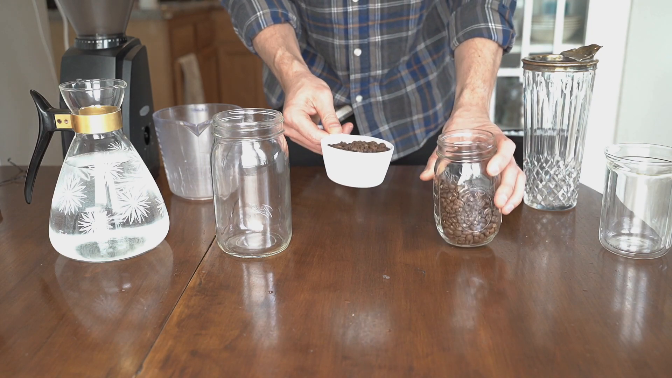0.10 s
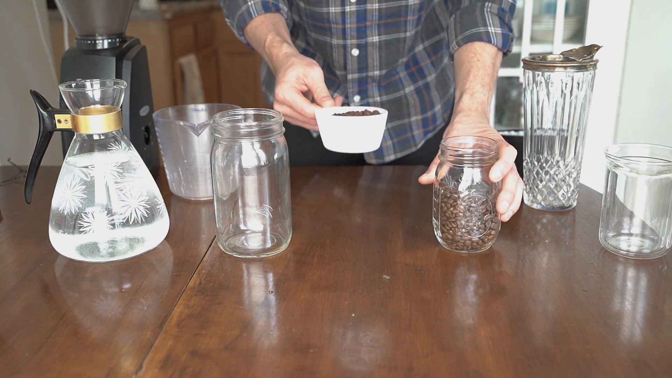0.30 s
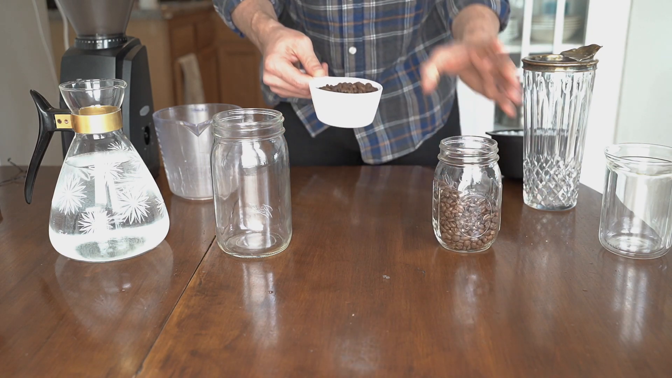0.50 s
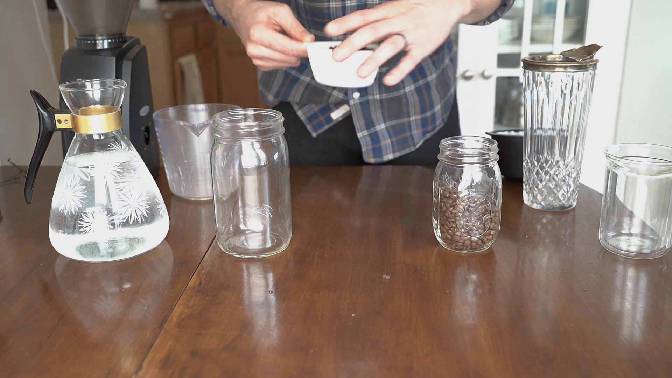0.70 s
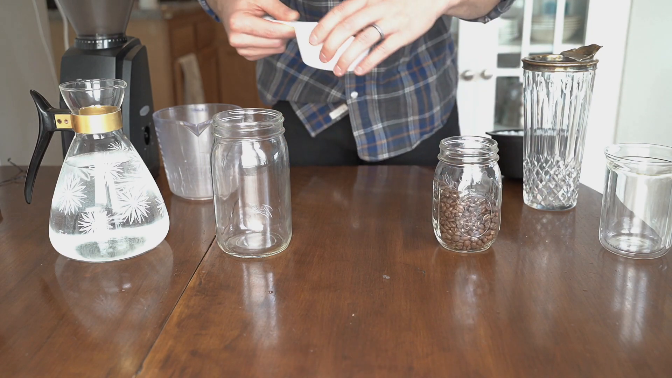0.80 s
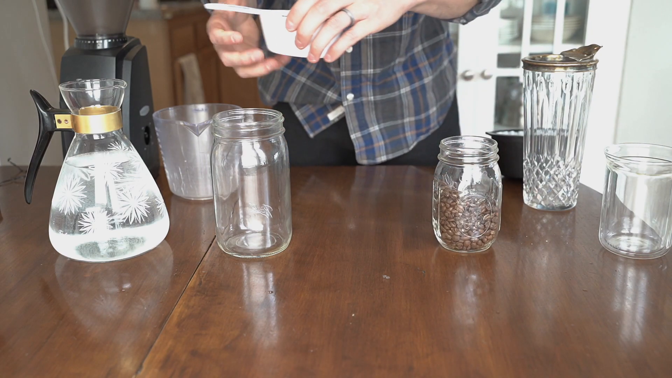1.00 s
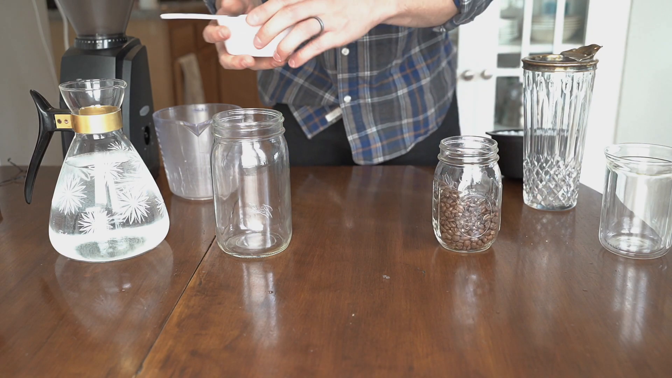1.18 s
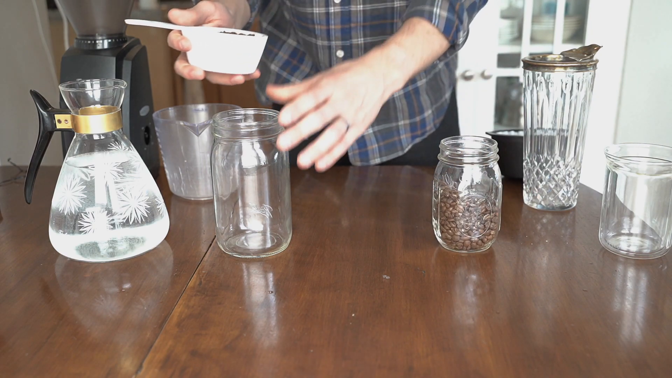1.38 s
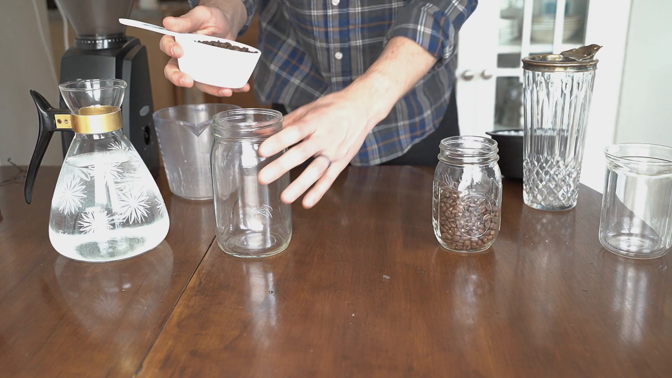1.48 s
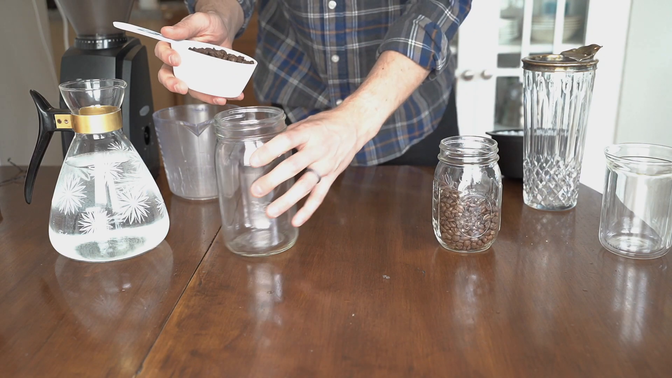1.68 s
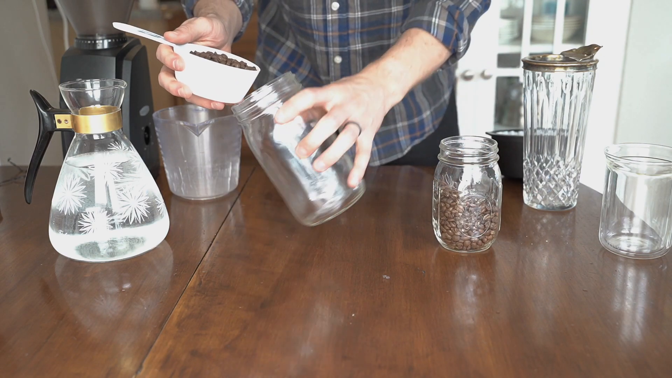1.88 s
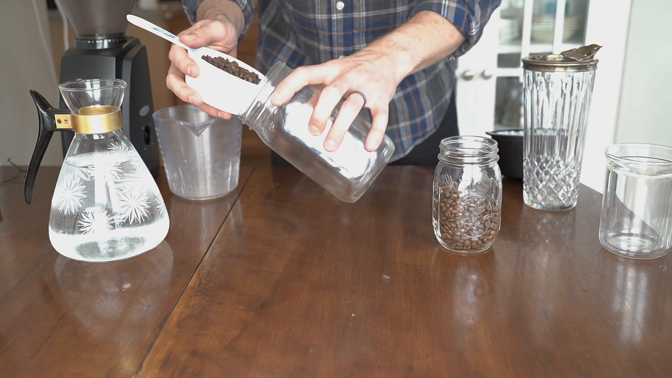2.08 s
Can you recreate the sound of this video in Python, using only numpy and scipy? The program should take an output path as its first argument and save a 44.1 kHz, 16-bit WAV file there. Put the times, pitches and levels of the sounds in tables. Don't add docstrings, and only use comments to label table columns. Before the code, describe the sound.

Coffee beans rattle briefly in a glass jar, which thumps down on a wooden table; after a pause beans crunch in a plastic cup, then its rim clicks on an empty jar. Close microphone, small kitchen.

```python
import sys
import numpy as np
from scipy import signal
from scipy.fft import rfft, irfft, next_fast_len
from scipy.io import wavfile
from scipy.ndimage import map_coordinates

SR = 44100
rng = np.random.default_rng(int(sys.argv[2]) if len(sys.argv) > 2 else 0)


def gain_from_decibels(decibels):
    exponent = np.asarray(decibels, float) / 20
    return 10 ** exponent


def dump(signal):
    limited = np.clip(np.atleast_2d(signal).T, -1, 1)
    pcm = np.round(limited * 32767).astype(np.int16)
    wavfile.write(sys.argv[1], SR, pcm)


N = 94815

WET_DB = {"rattle": -9.5, "thump": 3, "rock": -7, "cup": -11.5, "tap": -10, "glass": -18.5}


def unit(x):
    return x / np.sqrt(np.mean(x ** 2) + 1e-20)


def along(points, hz):
    f, v = np.transpose(points)
    return np.interp(np.log(hz + 1), np.log(f + 1), v)


def filtered(x, response):
    m = 2 * next_fast_len(N // 2 + SR // 4)
    spectrum = rfft(x, m) * response(np.fft.rfftfreq(m, 1 / SR))
    return irfft(spectrum, m)[..., :N]


def causal(spectrum):
    def response(hz):
        cepstrum = irfft(np.log(np.maximum(gain_from_decibels(along(spectrum, hz)), 1e-4)))
        cepstrum[1:len(hz) - 1] *= 2
        cepstrum[len(hz):] = 0
        gain = np.exp(rfft(cepstrum))
        return gain / np.abs(irfft(gain)).max()
    return response


def band(hz, width_hz):
    return unit(filtered(rng.standard_normal(N), lambda f: 1 / (1 + ((f - hz) / width_hz) ** 4)))


def ring(modes, s, db, rise_s):
    t = np.maximum(np.arange(N) / SR - s, 0)
    decaying = sum(gain_from_decibels(db + level - 60 * t / t60) * np.sin(2 * np.pi * hz * t) for hz, level, t60 in modes)
    return (1 - np.exp(-t / rise_s)) * decaying


def clicks(events):
    x = np.zeros(N)
    for s, db, *_ in events:
        x[round(s * SR)] = gain_from_decibels(db)
    return x


def grains(per_s, spread_db):
    chance, sign, size = rng.random((3, N))
    return (chance < per_s / SR) * np.sign(sign - .5) * gain_from_decibels(-spread_db * np.log(size + 0.03))


def bursts(rows, rise_s):
    t = np.arange(N) / SR
    envelope = 0
    for s, db, length in rows:
        rise = np.clip((t - s) / rise_s, 0, 1)
        envelope = envelope + gain_from_decibels(db) * rise * np.exp(-np.maximum(t - s - length, 0) / rise_s)
    return envelope


def room(x, wet_db, direct=1):
    # f/Hz, t60/s
    kitchen = [(100, 0.4), (300, 0.45), (700, 0.33), (2000, 0.32), (5000, 0.33), (8000, 0.3), (14000, 0.23)]
    hz, t, z = signal.stft(rng.standard_normal(SR), SR, nperseg=256)
    decay = gain_from_decibels(-60 * t / along(kitchen, hz)[:, None])
    tail = signal.istft(z * decay, SR, nperseg=256)[1]
    tail = np.pad(tail, (90, 0))
    return direct * x + gain_from_decibels(wet_db) * 2 * signal.fftconvolve(x, tail / np.linalg.norm(tail))[:N]


def full_jar():
    # t/s, level/dB
    rattle = [(0, -41.5), (.05, -44), (.08, -41), (.165, -47), (.19, -70), (0.224, -51), (.24, -76),
              (.29, -78)]
    # t/s, level/dB rms, length/s
    bean_hits = [(.0668, -27, 0.0012), (.0815, -30.5, 0.0022), (.1008, -30.5, 0.0018),
                 (.1275, -36.5, 0.0014), (.1458, -33.5, 0.0018), (.1577, -29, 0.0015), (.218, -47.5, 0.011)]
    # f/Hz, width/Hz, level/dB
    jar_modes = [(615, 39, -11), (1987, 50, -27.5), (2857, 28.5, -2.5), (5820, 36, 3.5), (6460, 270, -4),
                 (7180, 80, 2), (8070, 77, -9.5), (8600, 78, -10), (9370, 11, 2.5), (9590, 14, -23),
                 (11800, 60, -9), (13100, 92, -25.5), (13800, 49, -24.5)]
    # f/Hz, level/dB
    bean = [(500, -23.5), (2500, -17), (4200, -19), (5500, -6), (7200, -7.5), (10500, -13), (15500, -12)]

    def voice(x):
        def response(f):
            glass = sum(gain_from_decibels(db) * 1j * f * w / (c * c - f * f + 1j * f * w) for c, w, db in jar_modes)
            click = causal(bean)(f)
            return gain_from_decibels(13.5) * glass + 1.08 * click / np.abs(click).max()
        return filtered(x, response)

    level = gain_from_decibels(np.interp(np.arange(N) / SR, *np.transpose(rattle), right=-140))
    push = grains(per_s=3500, spread_db=4)
    hits = band(7500, 2500)
    rattling = level * push / voice(push).std()
    landing = bursts(bean_hits, 0.00079) * hits / voice(hits).std()
    return voice(rattling + landing)


def air():
    # f/Hz, level/dB
    tone_colour = [(12, -37.5), (20, 1.5), (64, -1.5), (90, -14), (290, -16), (478, -21), (649, -22.5),
                   (4190, -31.5), (15500, -40)]
    # f/Hz, level/dB
    hum_partials = [(59.5, -57), (120, -72), (141, -65.5)]
    t = np.arange(N) / SR
    tone = gain_from_decibels(-57) * unit(filtered(rng.standard_normal(N), lambda f: gain_from_decibels(along(tone_colour, f))))
    lumps = gain_from_decibels(5 * map_coordinates(rng.standard_normal(40), [t * 9]))
    low = unit(filtered(rng.standard_normal(N), lambda f: f / 30 / (1 + (f / 45) ** 4)))
    rumble = gain_from_decibels(-63.5) * lumps * low
    hum = sum(gain_from_decibels(db) * np.sin(2 * np.pi * hz * t) for hz, db in hum_partials)
    hiss = unit(filtered(rng.standard_normal(N), lambda f: 1 / (1 + (8810 / (f + 1)) ** 4)))
    apart = gain_from_decibels(-77.5) * hiss
    return tone + rumble + hum + np.array([apart, -apart])


def table_top():
    # t/s, level/dB
    set_down = [
        (0.2018, -9),
        (0.2174, -20),
        (0.2237, -31),
    ]
    # t/s, level/dB
    rock = [
        (.399, -41.5),
        (1.625, -61.5),
        (1.685, -52),
        (1.698, -65),
    ]
    # f/Hz, level/dB
    wood = [(35, -27), (95, 2), (165, -15), (260, -2.5), (680, -1), (1200, -10.5), (3000, -31.5),
            (14000, -77)]
    # f/Hz, level/dB, t60/s
    boards = [(333.5, -23, 0.1), (433.4, -29, 0.18), (477, -27, 0.11), (599, -26.5, 0.075),
              (662.1, -28.5, 0.28), (722, -30.5, 0.17), (891, -34, 0.23), (242.9, -37, 0.22),
              (286, -29, 0.5)]
    # f/Hz, level/dB, t60/s
    neighbour = [(1507, -53, 1.2)]

    blow = filtered(clicks(set_down), causal(wood))
    blow = blow + sum(ring(boards, s, db + 1, 0.00078) for s, db in set_down)

    rock_hz = 857
    soft = filtered(clicks(rock), lambda f: 8 * causal(wood)(f) / (1 + 1j * f / rock_hz) ** 3)
    damped = [(hz, level, t60 * 0.45) for hz, level, t60 in boards]
    soft = soft + sum(ring(damped, s, db + 21, 0.0062) for s, db in rock)

    sympathetic = ring(neighbour, set_down[0][0], 0, .01)
    return room(blow, WET_DB["thump"]) + room(soft, WET_DB["rock"]) + sympathetic


def table_frame():
    # f/Hz, level/dB, t60/s
    legs = [(30.1, 1.5, 0.79), (62.3, 3, 0.3), (98.36, -2, 0.75), (81, -2.5, 0.18), (147.3, -26, 0.6)]
    # t/s, level/dB, rise/s, length/s
    shoves = [
        (0.205, -22, 0.012, 0.264),
        (.275, -25, 0.01, 0.13),
        (0.423, -33.5, 0.046, 0.17),
        (0.674, -48, 0.021, 0.092),
        (1.185, -51.5, 0.038, 0.07),
        (1.609, -38.5, 0.012, 0.16),
        (1.643, -39.5, 0.017, 0.068),
        (1.713, -37.5, .01, 0.072),
    ]
    stop_s = 0.02
    t = np.arange(N) / SR
    sway = 0
    for s, db, rise, length in shoves:
        sway = sway + ring(legs, s, db, rise) * np.exp(-np.maximum(t - s - length, 0) / stop_s)
    return sway


def cup():
    # t/s, level/dB rms, length/s
    pat = [
        (.776, -54, .004),
        (.781, -30.5, 0.0013),
        (.786, -31.5, .006),
        (.797, -22.5, 0.0063),
        (.809, -39.5, .006),
        (.824, -38.5, 0.0037),
    ]
    # t/s, level/dB rms, length/s
    settle = [(1.159, -56, .004), (1.202, -63.5, 0.0056), (1.244, -60.5, 0.0055), (1.382, -55, 0.0018),
              (1.502, -56, .003), (1.516, -57.5, 0.0033)]
    # t/s, level/dB rms, length/s
    shift = [(1.15, -65.5, 0.18), (1.19, -74, 0.036), (1.295, -73, 0.022), (1.5, -94, 0.063)]
    # t/s, level/dB rms, length/s
    skin = [
        (1.3, -84, 0.019),
        (1.755, -68.5, 0.051),
    ]
    # f/Hz, level/dB
    plastic = [(500, -55.5), (820, -30.5), (960, -6), (1500, -1), (2840, -1), (4830, 0), (8990, -8),
               (15500, -38)]

    crunch = unit(filtered(grains(per_s=11000, spread_db=2), causal(plastic)))
    small = unit(filtered(grains(per_s=9000, spread_db=4), causal(plastic)))
    slide = unit(filtered(small, lambda f: 1 / (1 + (3520 / (f + 1)) ** 4)))
    beans = crunch * bursts(pat, 0.0027) + small * bursts(settle, 0.0018) + slide * bursts(shift, 0.022)
    return beans + band(8500, 2800) * bursts(skin, 0.012)


def taps():
    # t/s, level/dB, glass ring/dB, pitch ratio of the air in the jar
    rim_taps = [
        (1.8769, -8, -6.5, 1.0),
        (2.1201, -24, 0.5, 0.96),
    ]
    # t/s, level/dB
    grip = [(1.6, -62)]
    # t/s, level/dB rms, length/s, f/Hz
    squeaks = [
        (1.962, -57, .01, 4620),
        (1.998, -65, .03, 3550),
        (2.025, -64, .045, 3250),
        (1.625, -67, .01, 3600),
    ]
    # f/Hz, level/dB, t60/s
    wall = [(1975, -22, .36), (1967.5, -24.5, .36)]
    empty_jar = [(1220, -20.5, 0.18), (1310, -21.5, .28), (1140, -37, .1), (1506, -29, 0.23)]
    cavity = [(411, -17, .24), (404, -23, .3)]
    # f/Hz, level/dB
    hollow_colour = [(150, -44), (466, -11.5), (646, -7), (1250, 5), (2090, -7), (2500, -11.5),
                     (7250, -21.5), (15500, -90)]
    snap_colour = [(1500, -32), (2500, -9), (6500, 2), (10500, -11.5), (15500, -27.5)]

    glass = sum(ring(wall[:1], s, db + 18, .005) for s, db in grip)
    for s, db, glass_db, pitch in rim_taps:
        inside = [(hz * pitch, level, t60) for hz, level, t60 in cavity]
        glass = glass + ring(wall + empty_jar + inside, s, db + glass_db, 0.00043)

    crack_db, crack_s = -28, 0.0056
    crack = band(5560, 3750) * bursts([(s, db + crack_db, crack_s) for s, db, *_ in rim_taps], .0006)
    snap = filtered(clicks(rim_taps), causal(snap_colour))
    rub = sum(band(hz, 165) * bursts([(s, db, length)], 0.0051) for s, db, length, hz in squeaks)
    hollow = room(filtered(clicks(rim_taps), causal(hollow_colour)), WET_DB["tap"])
    return hollow + crack + room(snap, -18, direct=0) + room(glass + rub, WET_DB["glass"])


def scene():
    jar = room(full_jar(), WET_DB["rattle"])
    table = table_top() + table_frame()
    return jar + air() + table + room(cup(), WET_DB["cup"]) + taps()


def band_limit(x):
    return signal.sosfilt(signal.butter(12, 15660, fs=SR, output="sos"), x)


def record(dry):
    top_hz = 15700
    mix = filtered(dry, lambda f: f < top_hz)
    return band_limit(mix)


dry = scene()
out = record(dry)
dump(out)
```